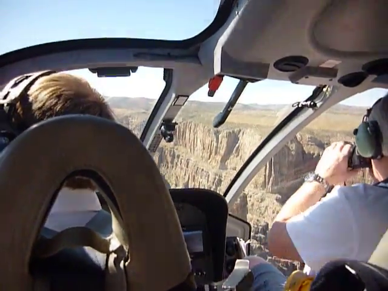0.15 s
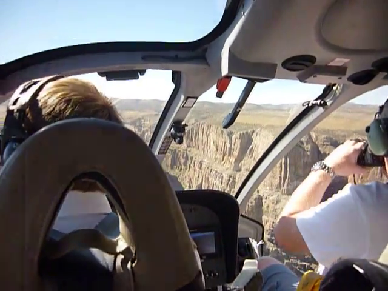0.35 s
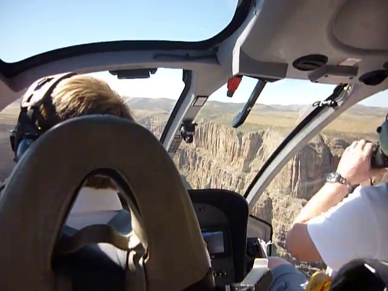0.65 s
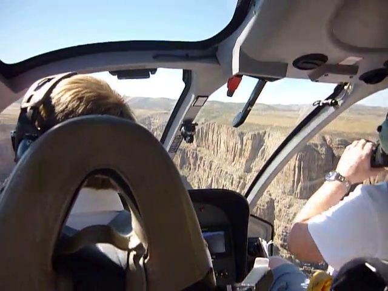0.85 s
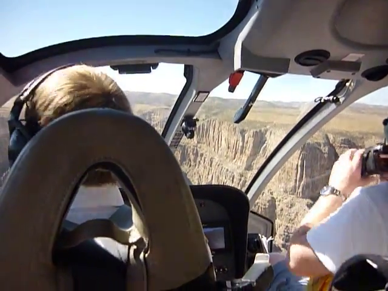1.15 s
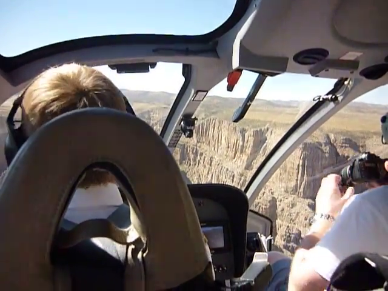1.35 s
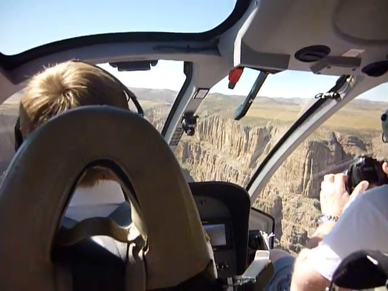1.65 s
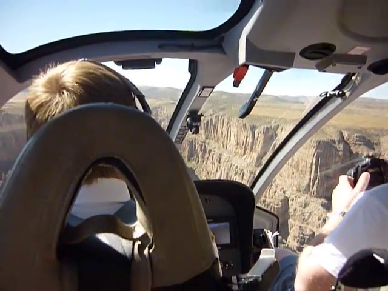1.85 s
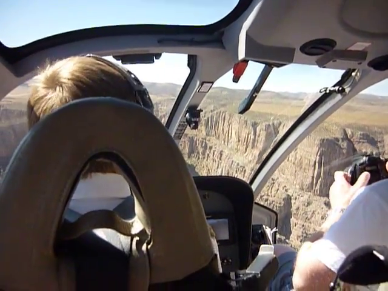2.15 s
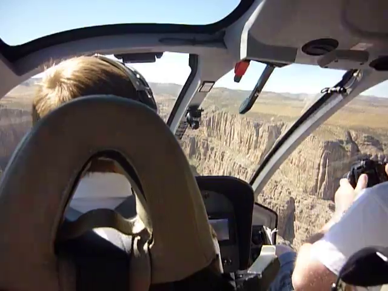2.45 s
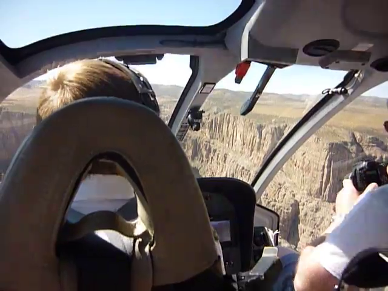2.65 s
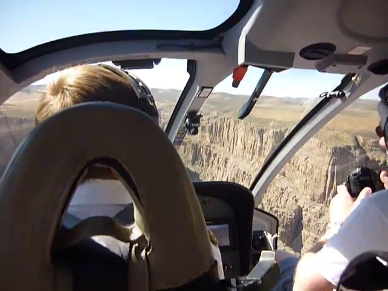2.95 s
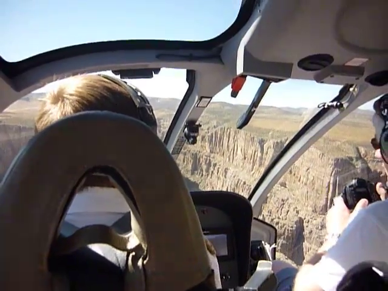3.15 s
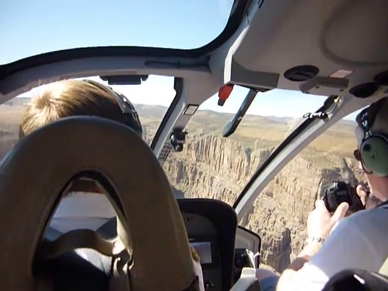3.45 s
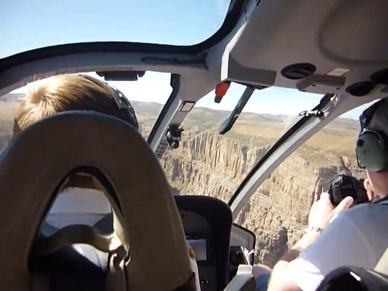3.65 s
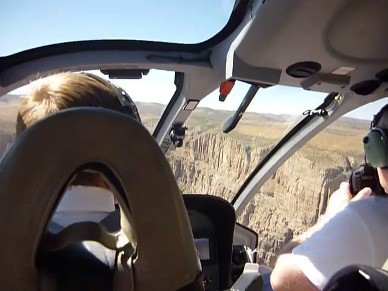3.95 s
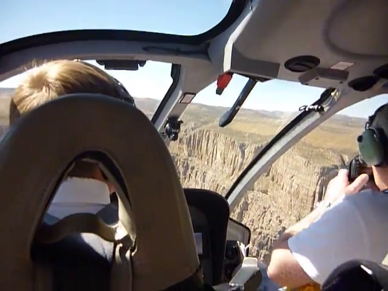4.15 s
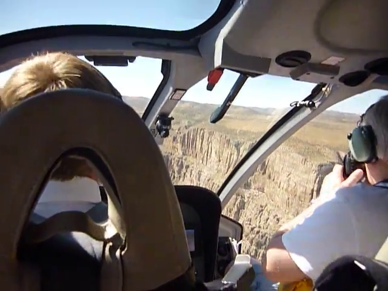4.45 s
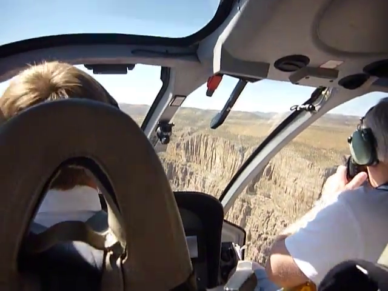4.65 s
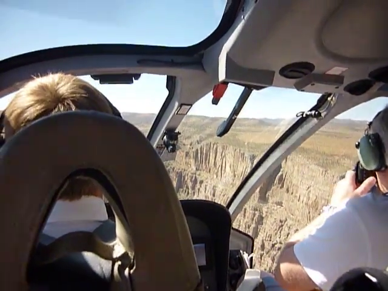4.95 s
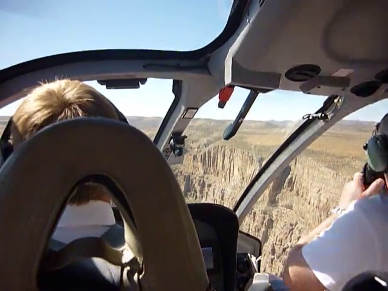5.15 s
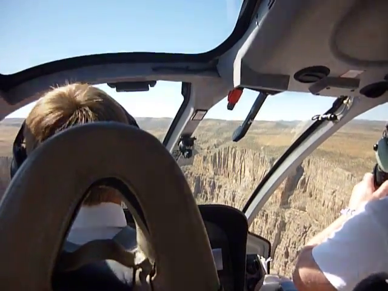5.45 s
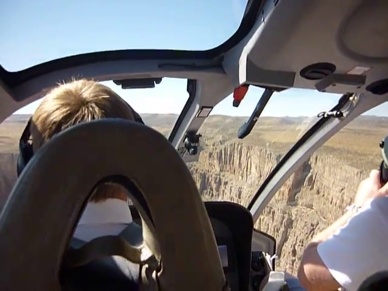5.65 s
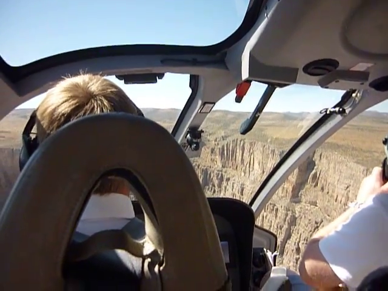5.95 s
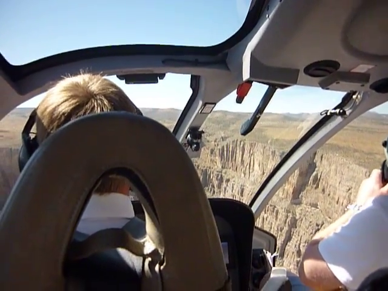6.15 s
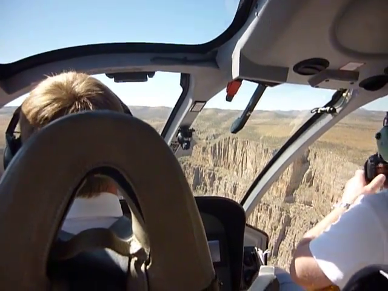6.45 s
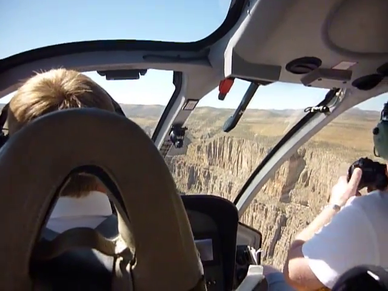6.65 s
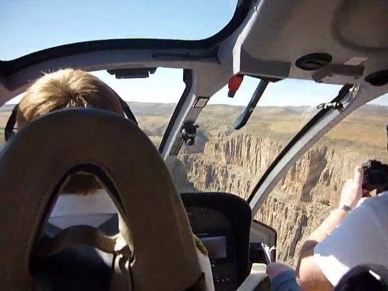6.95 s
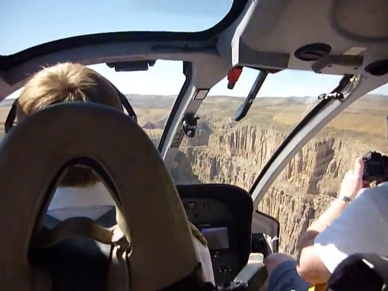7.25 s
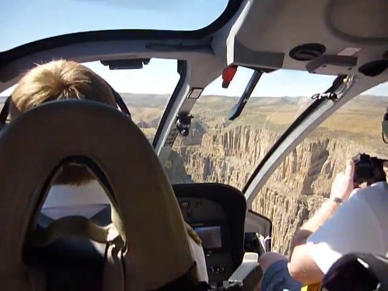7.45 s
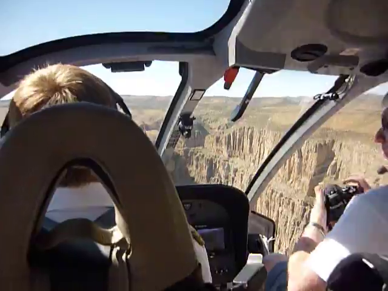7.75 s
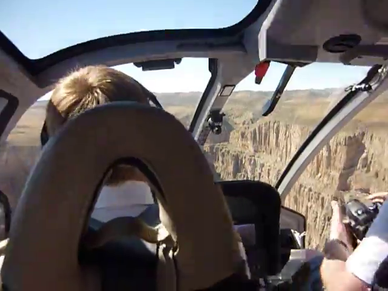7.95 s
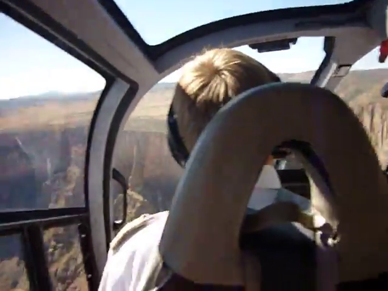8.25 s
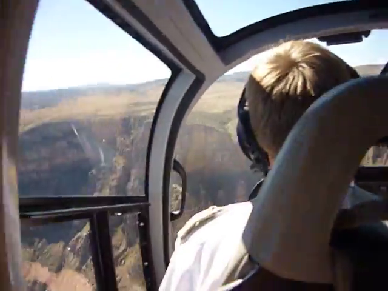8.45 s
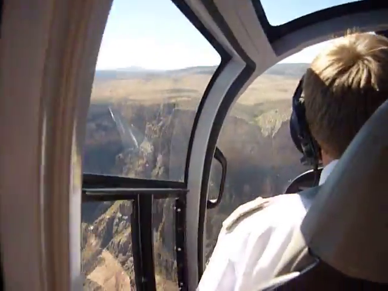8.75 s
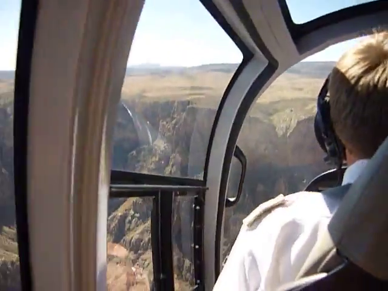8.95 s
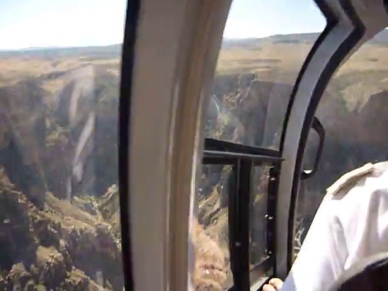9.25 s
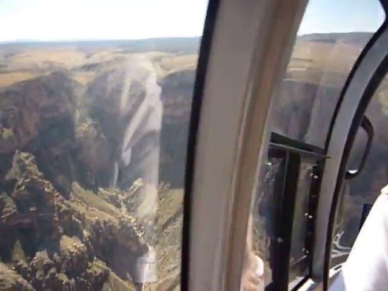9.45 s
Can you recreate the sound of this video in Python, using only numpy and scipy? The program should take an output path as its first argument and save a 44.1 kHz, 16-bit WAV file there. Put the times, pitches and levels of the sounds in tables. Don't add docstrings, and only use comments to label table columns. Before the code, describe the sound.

A helicopter in steady cruise, heard inside its small cabin through a hand-held camera's microphone. Low blade pulses, about twenty a second, throb under a constant gearbox whine and shaft hum. Air roars over the shell with mild gusts, a thin door seal whistle wanders, and something loose ticks with the blades. The whines dip and shift as the microphone moves, especially late, near the window.

```python
import sys
import numpy as np
from scipy import signal
from scipy.fft import rfft, irfft, next_fast_len
from scipy.io import wavfile
from scipy.ndimage import uniform_filter1d, map_coordinates

SR = 44100
rng = np.random.default_rng(int(sys.argv[2]) if len(sys.argv) > 2 else 0)


def invert_db(level):
    return 10 ** (np.asarray(level, dtype=float) / 20)


def transcribe(u):
    v = np.clip(np.atleast_2d(u).T, -1, 1)
    q = np.round(v * 32767).astype(np.int16)
    wavfile.write(sys.argv[1], SR, q)


N = 423801
STEP = 32
ROTOR_HZ, BLADES = 6.5353, 3
RING_TEETH, PLANET_TEETH = 100, 20


def unit(x):
    return x / np.sqrt(np.mean(x ** 2) + 1e-20)


def stretch(slow):
    return np.interp(np.arange(N) / STEP, np.arange(len(slow)), slow)


def wobble(rate):
    knots = rng.standard_normal(int(N * rate / SR) + 4)
    return stretch(map_coordinates(knots, [np.arange(0, N, STEP) * rate / SR]))


def spell(start, rise, end, fall):
    t = np.arange(0, N, STEP) / SR
    return np.clip(np.minimum((t - start) / rise, 1 + (end - t) / fall), 0, 1)


def near_pane():
    return stretch(spell(9.2, 0.18, 12, 0.1))


def filtered(x, response):
    m = next_fast_len(N + 8192)
    return irfft(rfft(x, m) * response(np.fft.rfftfreq(m, 1 / SR)), m)[..., :N]


def tone(turns, db):
    return np.sqrt(2) * invert_db(db) * np.sin(2 * np.pi * turns)


# (time [s], strength [dB])
GUSTS = [(1.6, 0.6), (3.75, 0), (4.52, 1.5), (6.3, 1.05), (7.5, 0.1), (8.45, 1.4), (9.38, 0.7)]


def gusts():
    t = np.arange(0, N, STEP) / SR
    gust_s, rougher_db_per_s = 0.24, 0.1474
    bumps = sum(db * np.exp(-((t - s) / gust_s) ** 2) for s, db in GUSTS)
    return stretch(rougher_db_per_s * t), stretch(bumps)


# (start [s], time to arrive [s], end [s], time to leave [s])
MOVES = [
    (1.69, .66, 4.27, .43),
    (3.39, 1.94, 12, .1),
    (6.8, 0.36, 7.87, .17),
    (8.15, 0.26, 8.42, .31),
    (8.17, 0.22, 8.65, 1.65),
]


def heard(db, changes, wander_db, sooner=0):
    drift, settle, (start, *lean), sweep, window = MOVES
    swept = spell(*sweep) + 0.22 * spell(4.12, 0.21, 4.29, 1.7)
    places = [spell(*drift), spell(*settle), spell(start - sooner, *lean), swept, spell(*window)]
    shift_db = stretch(np.dot(changes, places))
    flutter_db = wander_db + 0.15 * np.maximum(-shift_db, 0)
    return db + shift_db + flutter_db * wobble(4.5)


def rotor_turns():
    t = np.arange(N) / SR
    hunt_turns, hunt_s, hunt_peak_s = 0.0012, 3.15, 1.75
    return ROTOR_HZ * t + hunt_turns * np.cos(2 * np.pi * (t - hunt_peak_s) / hunt_s)


# (multiple of the blade rate, level [dB])
THUD = [(1, -42), (2, -36), (3, -34.5), (4, -58), (6, -38.5)]


def blades(blade):
    build_db, gust_db = gusts()
    load_db = 2.2 * (build_db - build_db.mean()) + 0.7 * gust_db - 0.3
    return sum(tone(k * blade + 0.53, db + load_db + 0.6 * wobble(0.92)) for k, db in THUD)


GEAR_BEATS = [(1, 0.012, 0.1), (2, 0.045, .04), (3, .01, 0.071), (4, 0.092, .04), (5, .03, 0.044)]


def gear_tone(turns, db, rotor, path):
    angle = rotor[::STEP]
    swell, drift = 0, 0
    for (beats, level_depth, phase_depth), (p, q) in zip(GEAR_BEATS, rng.random((len(GEAR_BEATS), 2))):
        swell = swell + level_depth * np.cos(2 * np.pi * (beats * angle + p))
        drift = drift + phase_depth * np.cos(2 * np.pi * (beats * angle + q))
    heard_turns = turns + stretch(drift) / (2 * np.pi) + path + rng.random()
    return (1 + stretch(swell)) * tone(heard_turns, db + 0.26 * wobble(7))


WHINE_DB = [-31, -33, -46.5, -47.5, -42.5, -56, -63.5, -63.5, -77, -78.5]
# (change by drift, settle, lean, sweep, window [dB])
WHINE = [(-0.9, -2, 0, 4.5, -9), (-1.2, -2, -0.2, -6, -0.5), (-1, -3.5, 2, -6, 1),
         (-0.5, -2.2, -0.3, -12.5, 0), (-2, -0.15, -11.5, 4.2, -11.5), (2.8, 9, -15, -8.5, -8),
         (4, 4.5, 4, -8, -3), (-6, 3, -2.5, 3.5, -3), (0, 0.5, -1, -2, 0), (0, 1, -2, -1, -2)]
THROB = [(.1, -.08, .15), (.16, -.04, .06), (.07, .3, .07), (.17, .4, .01), (.12, -.2, .01), (.03, .2, .05),
         (.08, .1, .05), (.08, -.3, .05), (.05, .1, .05), (.05, .4, .05)]


def gearbox(rotor, blade, shake):
    levels = []
    for k, (db, changes) in enumerate(zip(WHINE_DB, WHINE), 1):
        sooner_s = 0.16 if k == 6 else 0
        levels.append(heard(db, changes, 0.1 + 0.05 * k, sooner_s))
    mesh, whine = RING_TEETH * rotor, 0
    for k, (db, (once, lead, dip)) in enumerate(zip(levels, THROB), 1):
        throb = 1 + once * np.cos(2 * np.pi * (rotor + lead)) - dip * np.cos(2 * np.pi * blade)
        whine = whine + throb * gear_tone(k * mesh, db, rotor, k * shake)
    planet, fifth_db = mesh / PLANET_TEETH, levels[4]
    whine += tone(5 * mesh - planet, fifth_db - 24) + tone(5 * mesh + planet, fifth_db - 25)
    return whine + tone(6 * mesh - planet, -67) + tone(8 * mesh - planet, -68)


def driveline(rotor, blade, shake):
    t = np.arange(N) / SR
    build_db, gust_db = gusts()
    pinion_teeth, wheel_teeth, tail_hz = 17, 61, 60.4
    pinion_db = heard(-32.5, (-1.4, -3, 2, -2.5, -10.5), wander_db=-0.03) + 3 * near_pane()
    hum_db = -29.5 + build_db + 2.8 * gust_db + 0.6 * wobble(3)
    shaft = 15.549 * rotor
    teeth = pinion_teeth * shaft
    path = teeth[-1] / (RING_TEETH * rotor[-1]) * shake
    whine = tone(teeth + path, pinion_db + 0.5 * wobble(8))
    whine *= 1 - 0.045 * np.cos(2 * np.pi * blade)
    whine += tone(teeth - teeth / wheel_teeth, pinion_db - 19) + tone(2 * teeth, pinion_db - 34)
    tail = tone(tail_hz * t, -44) + tone(2 * tail_hz * t, -39 + 2 * wobble(1.3))
    turbine = tone(6666 * t + 0.1 * wobble(5.4), -81)
    return whine + tone(shaft, hum_db) + tail + turbine


def rush(spectrum, patchy_db):
    z = signal.stft(rng.standard_normal(N), nperseg=512)[2]
    field = uniform_filter1d(uniform_filter1d(rng.standard_normal(z.shape), 6, 0), 12, 1)
    x = signal.istft(z * invert_db(patchy_db * unit(field)), nperseg=512)[1][:N]
    f, db = np.transpose(spectrum)
    return unit(filtered(x, lambda hz: invert_db(np.interp(np.log(hz + 1), np.log(f), db))))


def panel_ring(hz, width):
    return unit(filtered(rng.standard_normal(N), lambda f: f * width / (hz * hz - f * f + 1j * f * width)))


# (frequency [Hz], density [dB per Hz])
RUMBLE = [(10, -34), (25, -20), (48, -17.5), (66, -5), (90, -4), (130, -1), (200, -4.5), (260, -5),
          (320, -4), (370, -8), (450, -12.5), (600, -23.5), (1000, -62.5)]
# (frequency [Hz], density [dB per Hz])
BODY = [(250, -30), (450, -4), (600, 1), (700, -1.5), (800, 0), (1000, -4), (1200, -4), (1500, -8),
        (1900, -11), (2300, -14.5), (2800, -20), (4000, -29.5), (7000, -72)]
# (frequency [Hz], density [dB per Hz])
HISS = [(1500, -30.5), (2800, 2), (3600, 0), (4200, 1.5), (4800, -4), (5500, -5.5), (6300, -7),
        (7000, -14.5), (9500, -24)]
# (frequency [Hz], width [Hz], level [dB])
PANELS = [(146.3, 18, -35.5), (290, 28, -38.5), (339.5, 8, -43.5), (397, 24, -44), (2104, 40, -49.5),
          (6570, 120, -69)]


def airflow(blade):
    build_db, gust_db = gusts()
    close = near_pane()
    wash = np.exp(1.5 * np.cos(2 * np.pi * blade))
    wash = unit(wash - wash.mean())
    eddy = wobble(9)
    rumble_db = -25.5 + build_db + gust_db + 1.9 * close + 0.22 * wash
    body_db = -31.5 + 0.55 * gust_db - 0.9 * close + 0.35 * wash + 0.24 * eddy
    hiss_db = -50.5 + build_db + 0.9 * gust_db + 1.2 * wash + 0.66 * eddy
    air = invert_db(rumble_db) * rush(RUMBLE, patchy_db=-0.2)
    air += invert_db(body_db) * rush(BODY, patchy_db=0.5)
    air += invert_db(hiss_db) * rush(HISS, patchy_db=1.54)
    for hz, width, db in PANELS:
        air += invert_db(db + gust_db - 0.6 + 1.5 * wobble(2.5)) * panel_ring(hz, width)
    return air


# (time [s], pitch [Hz])
WHISTLE = [(0, 1145), (1.1, 1141), (1.4, 1137), (3.3, 1136), (3.55, 1112), (3.95, 1121), (4.35, 1114),
           (4.8, 1088), (5.6, 1080), (5.85, 1107), (6.25, 1137), (7, 1140), (7.3, 1135), (7.85, 1148),
           (8.3, 1139), (8.9, 1106), (9.61, 1110)]
# (start [s], time to fall [s], end [s], time to return [s])
BREAKS = [(1.25, .6, 1.45, 1.6), (5.8, .1, 6.2, .1), (8.2, .1, 8.85, .1)]


def seal():
    s, pitch = np.transpose(WHISTLE)
    hz = np.interp(np.arange(N) / SR, s, pitch)
    db = -43.8 - 11 * stretch(sum(spell(*gap) for gap in BREAKS))
    return tone(np.cumsum(hz + 1.9 * wobble(14)) / SR, db + 1.4 * wobble(7))


TICK_DB = [-56, -42.5, -45]


def rattle(blade):
    starts = np.flatnonzero(np.diff(np.floor(blade)) > 0)
    which = np.floor(blade[starts + 1]).astype(int) % BLADES
    chance = rng.standard_normal((len(starts), 3))
    t, out = np.arange(SR // 20) / SR, np.zeros(N + SR)
    for at, k, (size, pitch, late) in zip(starts, which, chance):
        ring = np.sin(2 * np.pi * 4350 * (1 + 0.025 * pitch) * t) * (1 - np.exp(-t / 0.0034))
        decay_db = 60 * t / 0.05
        first = max(at + round(90 * late) - 200, 0)
        out[first:][:len(t)] += invert_db(TICK_DB[k] + 2.7 * size - decay_db) * ring
    return out[:N] * invert_db(2.5 * gusts()[1] - 0.7)


# (time [s], depth [dB])
DUCKS = [(0.16, -2.5), (0.72, -3), (1.18, -1.2), (1.42, -2.4), (1.93, -2), (2.59, -1.2), (3.03, -2),
         (3.9, -2.5), (4.19, -2), (4.37, -2), (5.87, -0.8), (6.04, -0.5), (7.49, -1.6), (8.28, -0.5),
         (8.63, -1), (9.1, -0.5), (9.39, -1.6), (9.54, -2)]


def gain_control():
    t, db = np.arange(SR // 2) / SR, np.zeros(N + SR)
    attack_s, recover_s = 0.013, 0.067
    dip = np.minimum(t / attack_s, 1) * np.exp(-t / recover_s)
    for s, depth_db in DUCKS:
        db[round(max(s - 0.03, 0) * SR):][:len(t)] += 1.3 * depth_db * dip
    return invert_db(db[:N] - db[:N].mean() + 0.39 * wobble(11))


def scene():
    rotor = rotor_turns()
    blade = BLADES * rotor - 0.27
    shake = 0.011 * wobble(8)
    machine = blades(blade) + gearbox(rotor, blade, shake) + driveline(rotor, blade, shake)
    return (machine + airflow(blade) + seal() + rattle(blade))[None]


def top_cut(x):
    return signal.sosfilt(signal.butter(12, 8630, fs=SR, output="sos"), x)


def record(dry):
    def colour(hz):
        bass_loss = hz ** 2 / (hz ** 2 + 35 ** 2)
        return bass_loss / np.sqrt(1 + (hz / 7700) ** 34) * (hz < 9000)
    offset = -0.0459
    mix = filtered(dry * gain_control(), colour) + offset
    return top_cut(mix)


dry = scene()
out = record(dry)
transcribe(out)
```